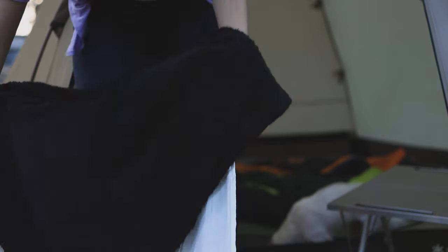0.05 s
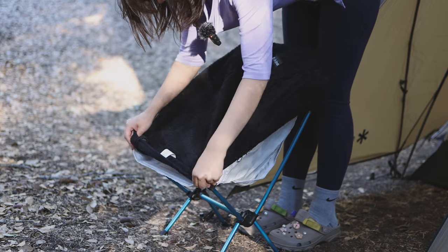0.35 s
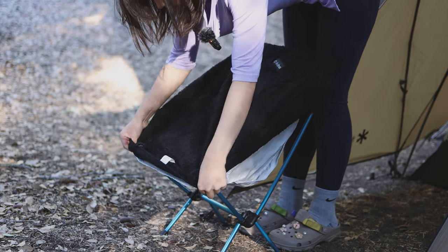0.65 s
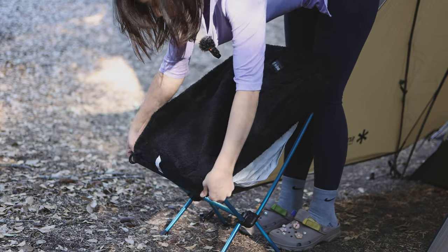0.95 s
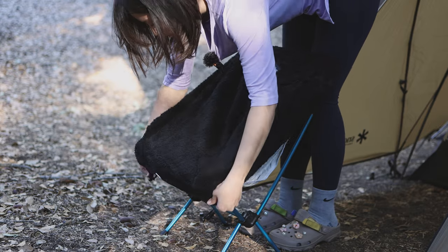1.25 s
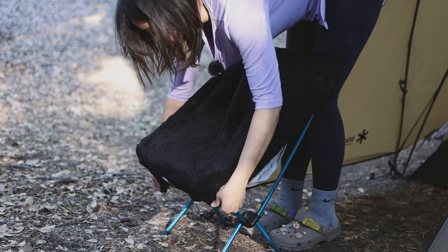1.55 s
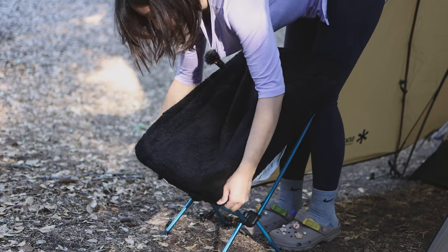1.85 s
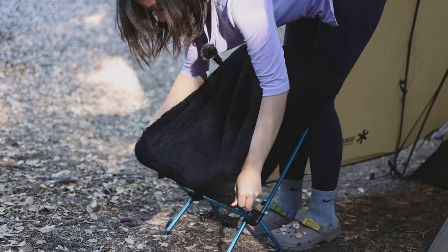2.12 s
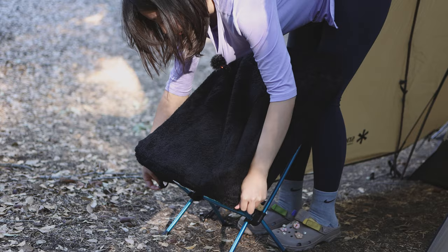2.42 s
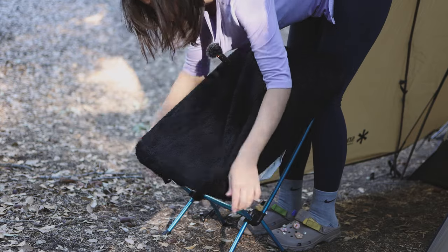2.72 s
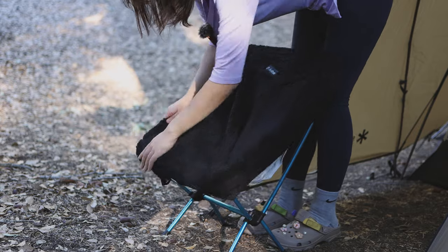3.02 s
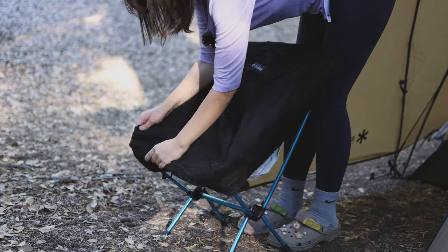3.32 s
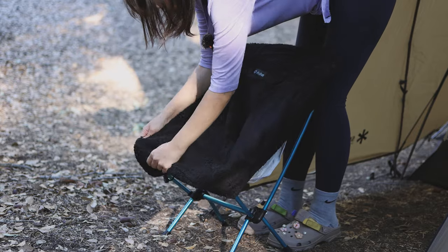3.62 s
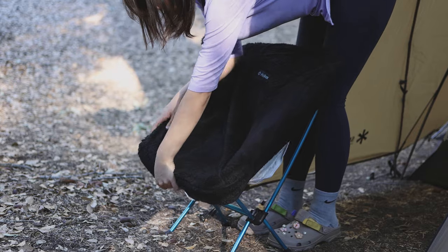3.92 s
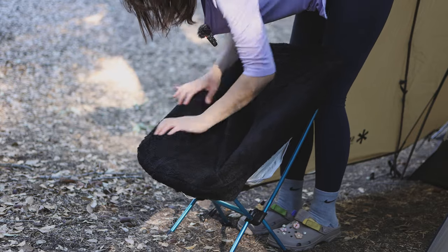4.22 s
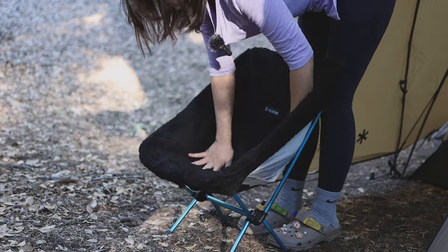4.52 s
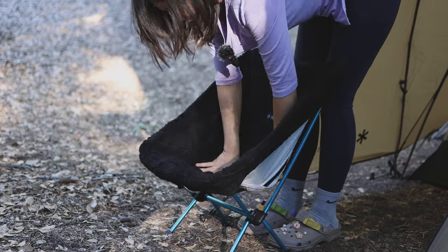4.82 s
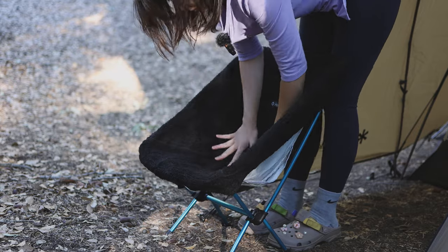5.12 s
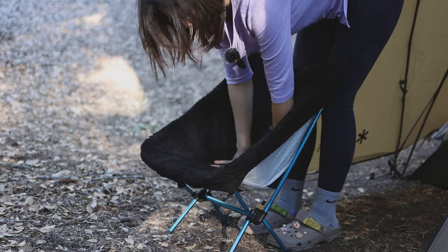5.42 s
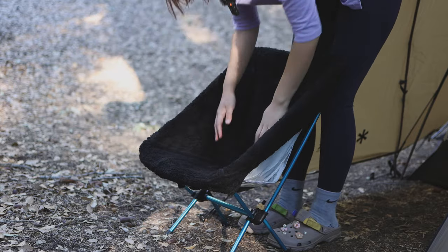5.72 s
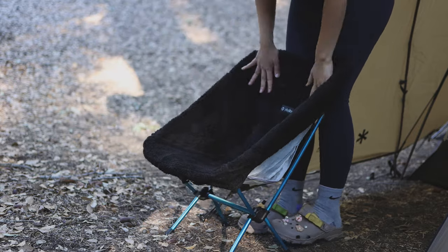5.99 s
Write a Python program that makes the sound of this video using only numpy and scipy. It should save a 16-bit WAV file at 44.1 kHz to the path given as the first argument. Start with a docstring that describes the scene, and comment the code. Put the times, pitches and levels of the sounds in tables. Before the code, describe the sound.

Close to the microphone, in quiet open air, soft cloth rustles and slides in uneven pulls as a cover is fitted onto a camp chair. Little flicks of tightening fabric and a few sharp frame clicks dot the rubbing. Then palms land on the stretched seat with hollow thuds and smooth it in louder swishes. The left side sounds duller than the right.

```python
"""Hissing, crumpling strokes of cloth: a fleece cover is tugged over the seat of a folding camp chair,
then patted and stroked flat. Countless fibres catch and slip, creases buckle and the stretched seat
drums softly. The cloth snaps taut, hands land with a thud and a puff of air, and the frame and hem
tick. It is heard close up, outdoors, and sounds dull on the left."""
import sys
import numpy as np
from scipy import signal
from scipy.fft import rfft, irfft, next_fast_len
from scipy.io import wavfile
from scipy.ndimage import uniform_filter1d, map_coordinates

SR = 44100
rng = np.random.default_rng(int(sys.argv[2]) if len(sys.argv) > 2 else 0)


def generate_wav(sig):
    """Save sig (samples, or channels by samples) to the path in sys.argv[1] as 16-bit PCM at SR."""
    pcm = np.round(np.clip(np.atleast_2d(sig).T, -1, 1) * 32767).astype(np.int16)
    wavfile.write(sys.argv[1], SR, pcm)


N = 267025
TIME = np.arange(N) / SR


def gain(db):
    """Turn decibels into a number to multiply by."""
    return 10 ** (np.asarray(db) / 20)


def unit(x):
    """Scale a sound to an average strength (rms) of 1."""
    return x / np.sqrt(np.mean(x ** 2))


def colour(x, tone):
    """Shape a sound's lows and highs with a table of f/Hz, level/dB; strength 1."""
    hz, db = np.transpose(tone)
    size = next_fast_len(N + 8192) // 2 * 2
    freqs = np.maximum(np.fft.rfftfreq(size, 1 / SR), 1)
    curve_db = np.interp(np.log(freqs), np.log(hz), db)
    cepstrum = irfft(np.log(gain(curve_db)))
    cepstrum[1:size // 2] *= 2  # with the next line: ring after each click, never before it
    cepstrum[size // 2 + 1:] = 0
    return unit(irfft(rfft(x, size) * np.exp(rfft(cepstrum)))[:N])


def lowpass(x, hz):
    """Gently dull everything above hz."""
    return signal.sosfilt(signal.butter(1, hz, fs=SR, output="sos"), x)


def wander(rate):
    """A random curve of strength 1 that turns about rate times a second."""
    hold = int(SR / rate)
    steps = np.repeat(rng.standard_normal(N // hold + 1), hold)
    return unit(uniform_filter1d(steps, hold)[:N])


def add(track, s, sound):
    """Mix a sound into the track at s seconds."""
    start = int(s * SR)
    track[start:start + len(sound)] += sound[:max(N - start, 0)]


def slips(per_s, scatter_db):
    """Cloth catches and lets go in tiny random clicks, a few much stronger than the rest."""
    happens = rng.random(N) < per_s / SR
    return happens * rng.choice([-1, 1], N) * gain(scatter_db * np.minimum(rng.standard_normal(N), 2))


def refold(x, depth_db, patch_hz=170, patch_s=0.08):
    """Folds and pockets change shape, so patches of the sound grow and fade; strength 1."""
    hz, s, spectra = signal.stft(x, SR, nperseg=512)
    shapes = rng.standard_normal((200, 200))
    grid = np.meshgrid(hz / patch_hz, s / patch_s, indexing="ij")
    patches = map_coordinates(shapes, grid, order=3, mode="wrap")
    return unit(signal.istft(spectra * gain(depth_db * patches), SR)[1][:N])


# Tone of the sliding fleece: f/Hz, level/dB
FLEECE_TONE = [(700, -21), (1550, -2), (2050, -5), (2560, 2), (3100, -2), (3450, 0), (4100, -3.5),
               (4700, -3.5), (5300, -4.5), (7500, -7.5), (10000, -11), (13000, -17), (16000, -22)]
# How much the highs above 5 kHz are turned up or down: t/s, level/dB
FLEECE_TREBLE = [(0, -5), (.3, 3.5), (1.0, -1), (2.3, 4), (2.6, -0.5), (3.3, 4), (4.6, -2), (5.37, -2),
                 (5.52, -4.5), (5.8, -1)]


def fleece_hiss():
    """Fibres slip so often that their clicks blur into a hiss."""
    hiss = refold(colour(slips(per_s=16000, scatter_db=4.5), FLEECE_TONE), depth_db=2.5)
    treble = hiss - lowpass(hiss, hz=5000)
    treble_db = np.interp(TIME, *np.transpose(FLEECE_TREBLE))
    return hiss + treble * (gain(treble_db) - 1)


# Tone of the crumpling creases: f/Hz, level/dB
CREASE_TONE = [(400, -9), (760, -9), (1000, 3.5), (1200, 0.5), (1450, 1.5), (1800, -5), (2200, -5.5),
               (4000, -39)]


def crumpling():
    """Creases give way in fewer, lower clicks."""
    return refold(colour(slips(per_s=2500, scatter_db=1.5), CREASE_TONE), depth_db=2.07)


# Tone of the rubbed seat: f/Hz, level/dB
SEAT_TONE = [(30, -36), (60, -16.5), (110, -8), (200, -0.5), (290, 2.5), (400, -2.5), (510, -1), (720, -9),
             (1200, -37)]


def seat_drumming():
    """Slips shake the stretched seat like a soft drum skin."""
    return colour(slips(per_s=700, scatter_db=3.5), SEAT_TONE)


# Pulls and strokes of the hands: start t/s, length/s, sliding level/dB, rise from start to end/dB,
# crumpling above sliding/dB, pressing above sliding/dB
STROKES = [(-.03, 0.17, -51, -4, -5, 1), (0.187, 0.31, -60.5, -7, 3, 2.5), (0.508, 0.11, -59, 1, 1.5, 2.5),
           (0.653, 0.16, -66.5, 9, 4, 6), (0.827, 0.053, -59.5, 9, 5, 0.5),
           (0.928, 0.25, -54.5, 7, 3.5, 2.5), (1.137, .06, -49.5, 5.5, -0.5, 2),
           (1.236, 0.087, -49, 0.5, -0.5, 1.5), (1.355, .12, -52.5, -0.5, 3.5, 4),
           (1.499, .14, -49, 6, 1, 2.5), (1.662, 0.073, -54, -3, 0, -1.5), (1.83, 0.14, -54.5, 13, 0, -1),
           (2.035, 0.058, -47, 4.5, 4.5, 0), (2.166, 0.2, -50, 1.5, 0.5, 2.5),
           (2.376, 0.14, -50.5, 5.5, 2, -2.5), (2.539, 0.1, -53.5, -4, 1, -0.5),
           (2.696, 0.11, -48.5, 1.5, -1.5, 0.5), (2.857, .21, -63, -7.5, 1, -0.5),
           (3.084, .075, -61.5, -2, 2, 5.5), (3.173, 0.13, -54.5, -2.5, 3.5, 5.5),
           (3.313, 0.096, -52, 1.5, 3, 3.5), (3.427, 0.13, -49.5, -6, 2.5, 4.5),
           (3.575, 0.17, -56.5, 0, 2.5, -2), (3.722, 0.086, -50, 5.5, 4.5, 2),
           (3.82, 0.2, -51.5, 5, 0.5, -3), (4.051, 0.067, -51.5, 4.5, -1, 3),
           (4.156, 0.13, -58.5, -6.5, 0, 2.5), (4.357, 0.017, -71.5, -13, 9, 16.5),
           (4.519, 0.17, -42, -3.5, -2.5, -1), (4.695, .15, -41.5, -1.5, -1.5, -0.5),
           (4.851, 0.12, -46.5, -4.5, 3, 1.5), (4.957, 0.17, -52.5, 1.5, 0, 3),
           (5.257, 0.23, -40.5, 4, -4.5, -5), (5.501, 0.072, -44, -5.5, -3, -3),
           (5.632, .15, -48, -4, -1.5, -0.5), (6.009, .08, -55, -8, -3, 6.5)]


def stroke_levels(attack_s=0.0069, release_s=0.011, rest_db=-67.5):
    """Each stroke starts, swells or eases, and stops; gives sliding, crumpling and pressing in dB."""
    clock = TIME[::64]
    total = gain(rest_db) ** 2  # the cloth keeps settling between strokes
    for start, length, db, rise_db, crumple_db, press_db in STROKES:
        t = clock - start
        fade_in = (1 + np.tanh(t / (2 * attack_s))) / 2
        fade_out = (1 + np.tanh((length - t) / (2 * release_s))) / 2
        progress = np.clip(t / length, 0, 1)
        power = fade_in * fade_out * gain(db + rise_db * (progress - 0.5)) ** 2
        total = total + np.outer(gain([0, crumple_db, press_db]) ** 2, power)
    return [np.interp(TIME, clock, 10 * np.log10(layer)) for layer in total]


def rubbing(firm_stroke_db=-53):
    """Fleece slides over hands and seat; one changing grip makes all three sounds flutter together."""
    sliding_db, crumpling_db, pressing_db = stroke_levels()
    drumming_db = firm_stroke_db + 0.9 * (pressing_db - firm_stroke_db)  # grows slower than the hiss
    grip = wander(rate=55)
    return (fleece_hiss() * gain(sliding_db + 0.94 * grip)
            + crumpling() * gain(crumpling_db + 0.63 * grip)
            + seat_drumming() * gain(drumming_db + 2.0 * grip))


# Tone of the open air: f/Hz, level/dB
OUTDOOR_TONE = [(20, -26), (45, -15), (100, 2), (150, 1), (310, 0.5), (700, -27), (1100, -28), (2500, -30),
                (6000, -20), (16000, -27.5)]


def open_air(level_db=-63):
    """The outdoors murmurs, faint, low and wavering."""
    return colour(rng.standard_normal(N), OUTDOOR_TONE) * gain(level_db + 2.1 * wander(rate=5.04))


# Notes the struck seat rings with: multiple of the thud's pitch, level/dB, time to fade by 60 dB/s
SEAT_NOTES = [(.33, -24, 0.054), (0.661, -10.5, 0.035), (0.999, 4.5, 0.016), (1.55, -6, 0.02),
              (2.3, -11, 0.013)]
# Cloth snapping taut, fingers and palms landing: t/s, thud level/dB, thud f/Hz, flick level/dB
SNAPS = [(0.101, -27.5, 413, -29.5), (0.5801, -28, 331, -29.5), (0.861, -41, 260, -48),
         (0.9397, -28, 364, -30.5), (0.954, -24.5, 396, -33), (0.96, -24.5, 334, -29),
         (1.0492, -26, 302, -24.5), (1.242, -44, 272, -55), (1.279, -25, 270, -38), (1.285, -29, 222, -50),
         (1.364, -34.5, 350, -42), (1.628, -29, 292, -38), (1.871, -40, 340, -38.5), (2.033, -50, 330, -36),
         (2.064, -39, 372, -30), (2.073, -30, 252, -36), (2.12, -33.5, 328, -36.5),
         (2.229, -29.5, 340, -36.5), (2.335, -35.5, 410, -45), (2.806, -29.5, 263, -55),
         (2.832, -50, 370, -43.5), (2.854, -37.5, 252, -60), (3.244, -35, 412, -28.5),
         (3.256, -35, 353, -32), (3.272, -38, 270, -37), (3.417, -32, 480, -33), (3.557, -29, 296, -38),
         (3.592, -38, 392, -37), (3.794, -35.5, 420, -41), (3.974, -26, 273, -51), (4.129, -33, 293, -54),
         (4.525, -18.5, 335, -33), (4.537, -19, 266, -26), (4.878, -29.5, 240, -42), (5.264, -12, 316, -32),
         (5.304, -28, 228, -43), (5.999, -22.5, 216, -44)]


def snaps(flick_hz=1255, flick_s=0.0014, finger_db=-25.5, finger_push_s=0.0016, finger_lag_s=0.00073):
    """A fold whips straight with a short flick; the slower wave in the seat follows as a thud."""
    out, t = np.zeros(N), np.arange(SR // 10) / SR
    fibres = colour(rng.standard_normal(N), CREASE_TONE)
    # short ripples run through the cloth fastest, so the flick falls in pitch
    glide = np.cumsum(np.exp(0.22 * (1 - t / flick_s))) / SR
    chirp = np.sin(2 * np.pi * flick_hz * glide)
    swell = (t / flick_s) ** 2 * np.exp(2 - 2 * t / flick_s)  # loudest at flick_s
    for s, thud_db, thud_hz, flick_db in SNAPS:
        weight = gain(0.25 * (thud_db - finger_db))  # a heavy palm pushes longer than a fingertip
        age = np.maximum(t - finger_lag_s * weight, 0)
        detunes = 1 + 0.04 * rng.standard_normal(len(SEAT_NOTES))
        ring = sum(gain(db - 60 * age / fade_s) * np.sin(2 * np.pi * thud_hz * ratio * detune * age)
                   for (ratio, db, fade_s), detune in zip(SEAT_NOTES, detunes))
        thud = ring * (1 - np.exp(-(age / (finger_push_s * weight)) ** 2))
        scrape = 0.35 * np.roll(fibres, -int(s * SR))[:len(t)]
        flick = swell * (chirp + scrape)
        add(out, s, gain(thud_db) * thud / np.max(np.abs(thud)) + gain(flick_db) * flick)
    return out


# Sharp taps of frame parts and the taut hem: t/s, level/dB, centre f/Hz, width/Hz, scrape fade time/s
TICKS = [(.101, -32, 1800, 4000, 0.0047), (0.5806, -25, 7500, 12000, 0.0024),
         (0.764, -34, 9000, 12000, .0015), (.9596, -33.5, 2450, 1000, 0.003),
         (1.0475, -24.5, 2510, 1000, 0.0045), (1.091, -30, 2570, 1500, .0015),
         (1.107, -21, 4600, 6450, .0004), (2.067, -26.5, 1300, 500, 0.0035),
         (2.097, -29.5, 7760, 1800, 0.0027), (2.12, -36, 6000, 9000, 0.0014),
         (3.561, -31.5, 5000, 7000, .001), (4.042, -30, 13800, 3500, .0004),
         (4.0475, -22.5, 15000, 4500, 0.00034)]


def ticks(crack=7.3):
    """A sharp tap and a brief scrape start a ring that the cloth muffles at once."""
    out, t = np.zeros(N), np.arange(SR // 25) / SR
    for s, db, hz, width_hz, fade_s in TICKS:
        contact = rng.standard_normal(len(t)) * np.exp(-t / fade_s) + crack * (t == 0)
        ring = signal.iirpeak(hz, hz / width_hz, fs=SR)
        tick = signal.lfilter(*ring, signal.lfilter(*ring, contact))
        add(out, s, gain(db) * tick / np.max(np.abs(tick)))
    return out


# Tone of the air pushed out by the seat: f/Hz, level/dB
PUFF_TONE = [(25, -24), (50, -9), (90, 4), (170, -1.5), (280, 2), (450, -4), (900, -36), (3000, -53)]
# A hand leans in and the seat sags: t/s, level/dB, half length/s
LEANS = [(2.1, -38.5, 0.0087), (4.505, -42.5, 0.025), (4.607, -32, 0.027), (4.94, -43, 0.01),
         (5.265, -32.5, 0.025), (6.003, -43.5, 0.0094)]


def puffs(lag_s=0.01, half_length_s=0.021, db_per_octave=-8):
    """The whole seat gives way and puffs out air, after every thud and under a leaning hand."""
    # a puff is quieter than its thud; a taut, high-pitched seat gives less and moves less air
    after_thuds = [(s + lag_s, thud_db - 24.5 + db_per_octave * np.log2(thud_hz / 300), half_length_s)
                   for s, thud_db, thud_hz, _ in SNAPS]
    push = sum(gain(db) * np.exp(-((TIME - s) / half_s) ** 2) for s, db, half_s in after_thuds + LEANS)
    return push * colour(rng.standard_normal(N), PUFF_TONE)


def scene():
    """All the sounds meet at one spot, with no walls to echo."""
    sound = rubbing() + snaps() + puffs() + ticks() + open_air()
    return np.array([sound, sound])


def record(dry, hiss_db=-65, rumble_hz=42, top_hz=16200):
    """The left side gets mostly lows, the right takes the rest; both hiss faintly."""
    left = 1.19 * lowpass(lowpass(dry[0], hz=340), hz=7500)
    right = 2 * dry[1] - left
    out = np.array([left, right]) + gain(hiss_db) * rng.standard_normal((2, N))
    out = signal.sosfilt(signal.butter(2, rumble_hz, "high", fs=SR, output="sos"), out)
    return signal.sosfilt(signal.ellip(10, 0.2, 70, top_hz, fs=SR, output="sos"), out)


dry = scene()
out = record(dry)
generate_wav(out)
```